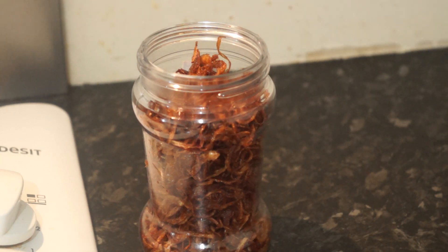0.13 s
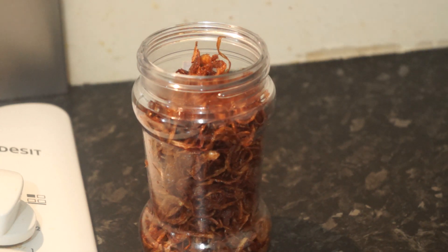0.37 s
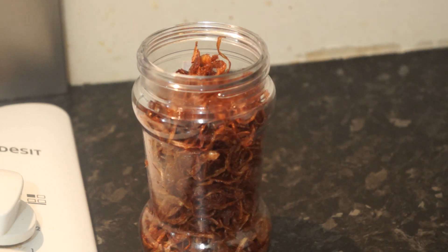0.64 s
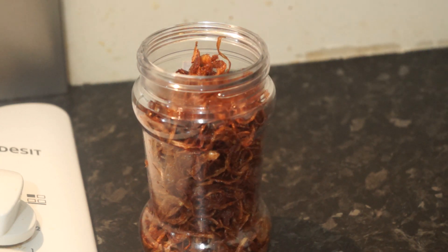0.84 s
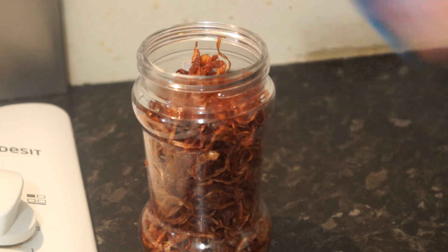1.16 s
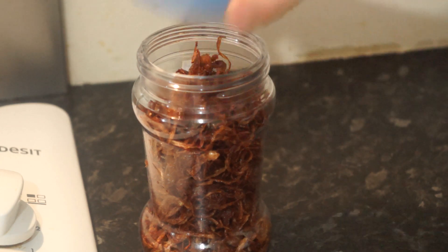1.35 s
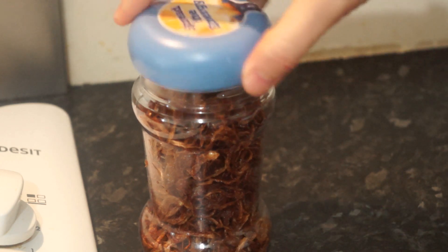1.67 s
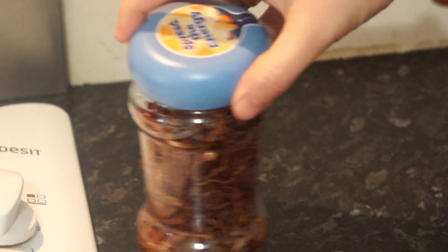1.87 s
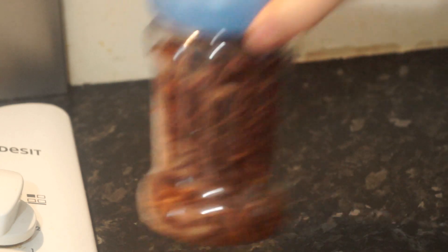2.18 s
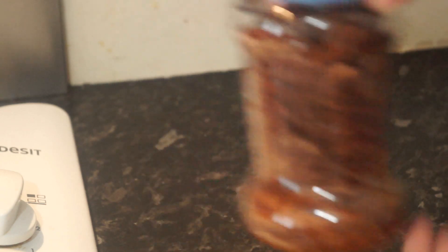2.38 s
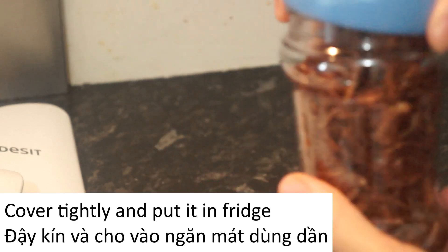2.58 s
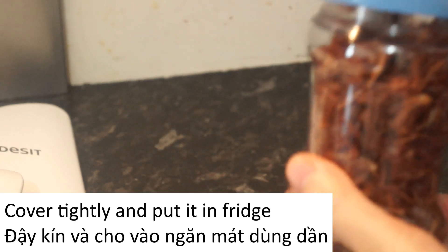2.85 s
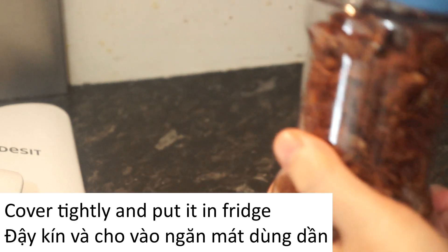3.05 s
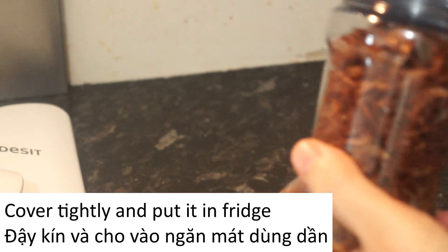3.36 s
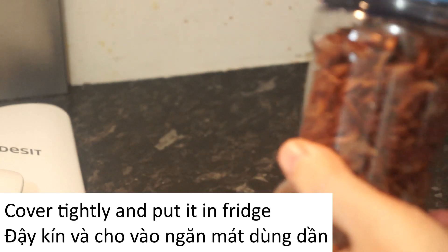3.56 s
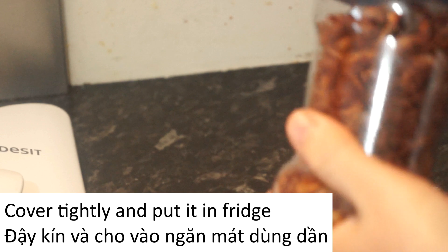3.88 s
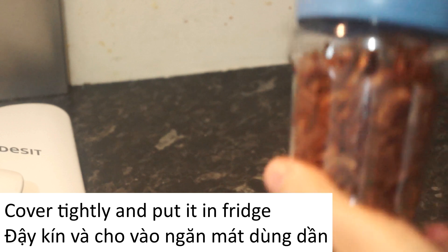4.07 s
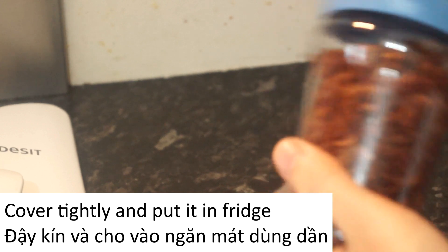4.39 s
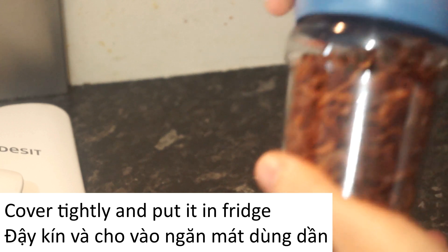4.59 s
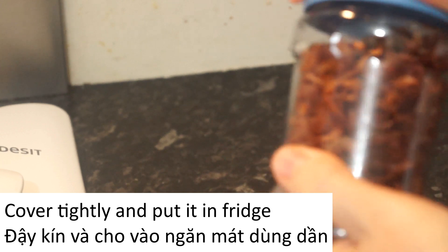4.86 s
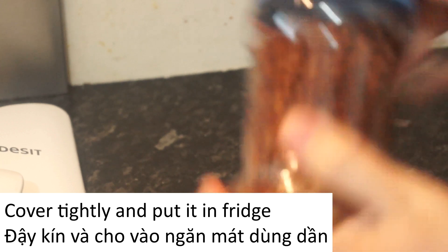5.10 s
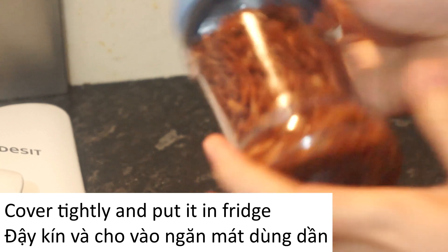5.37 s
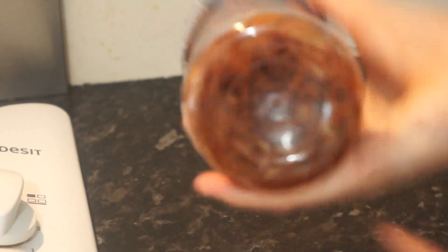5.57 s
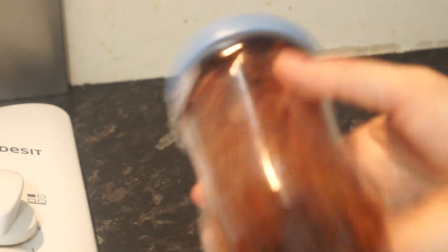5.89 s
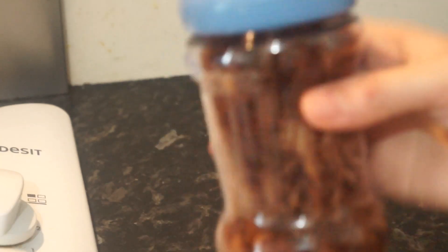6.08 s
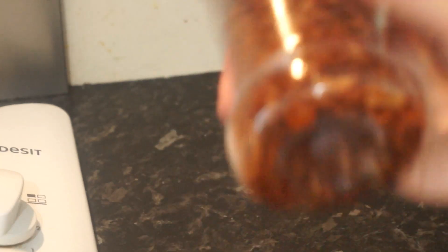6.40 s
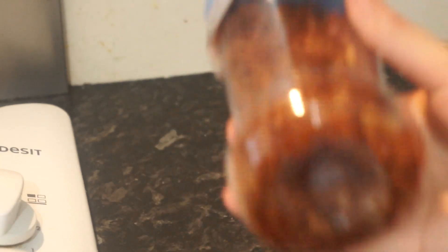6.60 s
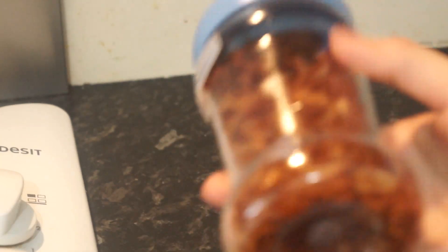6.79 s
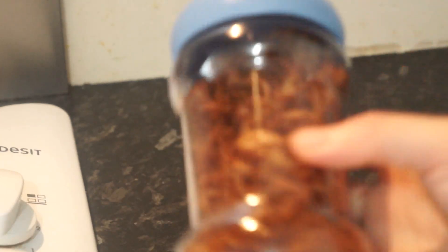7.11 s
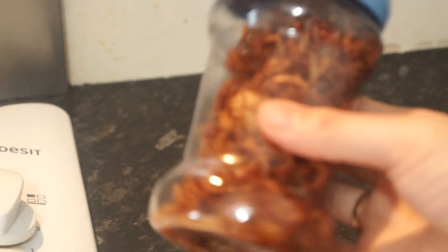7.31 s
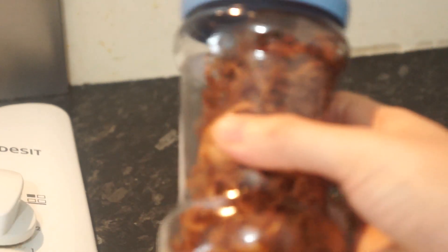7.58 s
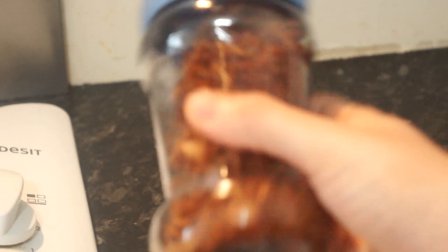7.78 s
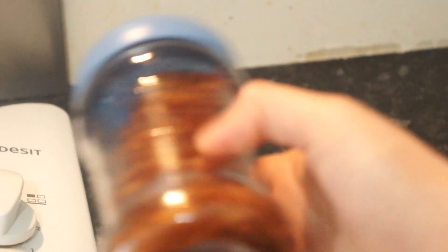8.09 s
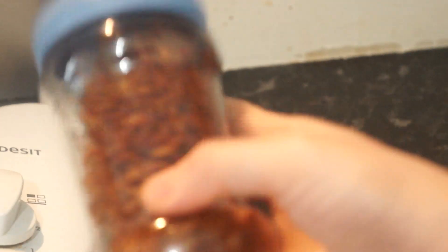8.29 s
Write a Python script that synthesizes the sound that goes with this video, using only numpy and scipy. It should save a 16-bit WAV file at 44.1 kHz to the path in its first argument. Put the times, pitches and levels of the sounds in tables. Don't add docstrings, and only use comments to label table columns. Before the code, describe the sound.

In a small hard kitchen, metal cutlery clatters briefly near the start. A plastic lid knocks onto a hollow plastic jar, seeks its thread, then is twisted shut with irregular sharp snaps and gritty scrapes. After a short lull the jar is tipped and dry crisp pieces pour inside in a dense crackling rustle, then mostly settle. Close stereo camera microphones, slightly hissy, with a faint distant motor.

```python
import sys
import numpy as np
from scipy import signal
from scipy.fft import rfft, irfft, next_fast_len
from scipy.io import wavfile
from scipy.ndimage import uniform_filter1d

SR = 44100
rng = np.random.default_rng(int(sys.argv[2]) if len(sys.argv) > 2 else 0)


def level_to_linear(level):
    exponent = np.asarray(level, float) / 20
    return 10 ** exponent


def master(y):
    cut = np.clip(np.atleast_2d(y).T, -1, 1)
    pcm = np.round(cut * 32767)
    wavfile.write(sys.argv[1], SR, pcm.astype(np.int16))


N = 372592
T = np.arange(N) / SR


def band(x, hz, width_hz):
    return signal.lfilter(*signal.iirpeak(min(hz, .45 * SR), hz / width_hz, fs=SR), x)


def steep(x, hz, width_hz):
    return band(band(x, hz, width_hz), hz, 2 * width_hz)


def unit(x):
    return x / np.sqrt(np.mean(x ** 2))


def read(points, hz):
    f, db = np.transpose(points)[:2]
    return np.interp(np.log(hz + 1), np.log(f), db)


def walk(rate):
    k = int(SR / rate)
    levels = rng.standard_normal(N // k + 1)
    return uniform_filter1d(np.repeat(levels, k), k)[:N]


def held(start, end, edge_s):
    swell = np.minimum(T - start, 0) / edge_s[0]
    fade = np.maximum(T - end, 0) / edge_s[1]
    return np.exp(swell - fade)


def lean(left_minus_right_db):
    return level_to_linear(np.array([[left_minus_right_db], [-left_minus_right_db]]) / 2)


def add(out, s, sound, pan_db):
    i = int(s * SR)
    piece = sound[:N - i]
    out[:, i:i + len(piece)] += piece * lean(pan_db)


def ring(hz, db, t60, push_s, length):
    t = np.arange(int(length * SR)) / SR
    mode = level_to_linear(db) * np.sin(2 * np.pi * hz * t) * 1000. ** (-t / t60)
    return mode * np.minimum(t / push_s, 1)


def tones(table, push_s, pan_db):
    out = np.zeros((2, N))
    for s, hz, db, t60 in table:
        add(out, s, ring(hz, db, t60, push_s, .4), pan_db)
    return out


# pitch in Hz, width in Hz, level in dB.
JAR_MODES = [(197, 180, -17), (338, 140, -4.5), (530, 163, -1.5), (880, 410, 1.5), (1090, 153, -3.5),
             (1564, 880, -5), (2085, 320, -5), (2380, 900, -1), (3600, 840, -4.5), (4420, 900, -5),
             (5320, 660, -9), (7020, 1300, -6.5), (8610, 1650, -6), (10300, 3900, -6)]


def knocks(table, soft_hz, burst_s, trim_db, pan_db, grit_db=-12, rattle_db=-18, click_db=-1):
    hard_db, spot_hz_per_db = -23, 99
    contact = 30
    out, t = np.zeros((2, N)), np.arange(1400) / SR
    zone = np.searchsorted([700, 1500, 4000], np.array(JAR_MODES)[:, 0], side="right")
    tear_gain = level_to_linear(grit_db) * (np.exp(-t / burst_s) + level_to_linear(rattle_db) * np.exp(-t / 0.028))
    for s, peak_db, hollow_db, wall_db, edge_db in table:
        spot_hz = soft_hz + spot_hz_per_db * max(peak_db - hard_db, 0)
        modes = [*JAR_MODES, (spot_hz, spot_hz / 2.5, -10)]
        chance = rng.standard_normal((len(modes), 2))
        tear = rng.standard_normal((len(modes), len(t))) * tear_gain
        tear[:, contact] += 2 * (-1.) ** np.arange(len(modes))
        zones_db = np.array([hollow_db + 5.5, wall_db + 2.5, 0, edge_db + 6.5])
        colour_db = [*zones_db[zone], 0]
        sound = 0
        for (hz, width_hz, db), zone_db, (detune, swing), push in zip(modes, colour_db, chance, tear):
            mode = steep(push, hz * (1 + .04 * detune), width_hz) * level_to_linear(1.5 * swing)
            sound = sound + level_to_linear(db + zone_db) * mode / np.abs(mode).max()
        click = band(1. * (t == t[contact]), spot_hz * 1.3, spot_hz * 1.5)
        sound = sound + level_to_linear(click_db + min(edge_db + 14, 0) / 2) * click / click.max()
        add(out, s - .0005, level_to_linear(peak_db + trim_db) * sound, pan_db + 0.87 * chance[0, 0])
    return out


# hollow 250-700 Hz in dB, wall 700-1500 Hz in dB, edge 4-11 kHz in dB.
SEATING = [(.0121, -47.5, -33, -9, -13), (.3697, -44, -35, -10, -15), (1.6105, -22.5, -26, -7.5, -32),
           (1.7201, -38.5, -13, -21, -35), (1.7905, -39, -13, -27, -22), (1.8465, -19, -14, -17, -10),
           (2.5207, -31, -18, -17, -1), (2.5476, -36, -12, -7, -22), (2.6297, -41.5, -4.5, 4.5, -2),
           (2.7482, -26, -18.5, -10, -14.5), (2.8972, -34.5, -17, -14, -6.5)]
TWISTING = [(3.0037, -21.5, -14, -22, -5.5), (3.0134, -12, -14, -21, -8), (3.0254, -16, -32, -8, -14.5),
            (3.159, -33, -22, -20, -10), (3.1835, -10.5, -23, -13.5, -12.5), (3.254, -26.5, -15.5, -5, -1),
            (3.2885, -21, -22, -18, -8), (3.46, -25.5, -18, -13.5, -5), (3.5285, -37, -3.5, -29, -3),
            (3.5368, -28.5, -26, -7, -12), (3.5511, -29.5, -15, -1.5, -2.5), (3.6812, -27.5, -30, -2, -0.5),
            (3.7525, -22.5, -15, -10.5, -15), (3.774, -43.5, -26, -14, 2.5), (3.8159, -24, -41, -11, -16.5),
            (3.8677, -30, -20, -5.5, -2), (3.8886, -23, -21.5, -8.5, -6.5),
            (4.0035, -24, -24.5, -11.5, -15.5), (4.0115, -25, -19, -8.5, -18), (4.0284, -30, -21, -6, -6),
            (4.021, -31, -20, -6, -8), (4.0436, -32, -35, -14, -14), (4.2612, -18, -33, -9, -9.5),
            (4.2640, -16.5, -24, -19, -10.5), (4.3138, -21, -20, -8, -16), (4.3641, -37, -7, -3, -5)]
HANDLING = [(4.861, -54, -31, -27, 8.5), (5.6535, -24.5, -54, -31, -14), (5.9903, -29.5, -21, -7, -9),
            (6.017, -35, -19, -10, -3), (6.4536, -24, -33, -13, -10), (6.6159, -35.5, -27, -10, -19),
            (7.7667, -46, -14, 3.5, 0), (7.7934, -39.5, -33, -30, -32), (7.869, -52.5, -13, -1, -15),
            (7.9118, -47.5, -17, -2, -3), (8.0072, -48, -20, 3, -5), (8.0977, -58.5, -13, -3, 6)]


def lid_and_jar():
    parts = [(SEATING, 2700), (TWISTING, 2150), (HANDLING, 2600)]
    return sum(knocks(table, soft_hz, burst_s=0.0029, trim_db=-5.5, pan_db=-6.0) for table, soft_hz in parts)


# time of the snap in seconds, build-up in seconds, final level in dB.
JUDDER = [
    (3.004, 0.0081, -46.5),
    (3.183, 0.0029, -25.5),
    (3.684, 0.01, -39.5),
    (4.029, 0.0095, -53),
    (4.26, 0.0034, -35),
]


def judder(left_db=3.0):
    swell = sum(level_to_linear(db) * np.exp(np.minimum(T - s, 0) / rise_s) * (T < s) for s, rise_s, db in JUDDER)
    grit = rng.standard_normal(N)
    colour = unit(band(grit, 990, 540) + 0.4 * band(grit, 1600, 5100))
    return swell * colour * lean(2 * left_db)


# start in seconds, end in seconds, scrape in dB, hollow rub in dB, scrape pitch in Hz.
STROKES = [(0.97, 1.034, -53, -48.5, 3160), (1.06, 1.213, -58, -51, 3160), (1.602, 1.85, -88, -55, 2500),
           (1.95, 2.244, -80, -62, 2500), (2.44, 2.658, -45, -58, 3950), (2.724, 2.798, -47.5, -51, 3160),
           (3.107, 3.21, -46, -51.5, 3000), (3.174, 3.345, -37.5, -45.5, 3300),
           (3.502, 3.57, -63, -50, 3160), (3.675, 3.75, -64, -46, 3160), (3.896, 4.03, -51, -62, 3160),
           (4.257, 4.49, -48, -55, 2900), (3.02, 3.09, -38, -60, 4200), (7.2, 7.45, -60, -80, 1850)]


def rub(left_db=-5.0):
    edge_s = 0.019
    grip = np.array([held(start, end, (edge_s, edge_s)) for start, end, *_ in STROKES])
    high_db, low_db, scrape_hz = np.array(STROKES)[:, 2:].T
    slips = rng.standard_normal(N) * level_to_linear(3.0 * walk(200))
    scrape = 0
    for hz in 1800 * 1.25 ** np.arange(7):
        nearness = np.exp(-(np.log(hz / scrape_hz) / 0.16) ** 2)
        level = (level_to_linear(high_db) * nearness) @ grip
        scrape = scrape + level * unit(steep(slips, hz, hz / 3.5))
    hollow = unit(band(slips, 400, 82) + 2.4 * band(slips, 965, 420))
    hollow = (level_to_linear(low_db) @ grip) * hollow
    return (level_to_linear(-14.5) * scrape + level_to_linear(-9.5) * hollow) * lean(2 * left_db)


# time in seconds, left minus right in dB.
JAR_SIDE = [
    (0, -5),
    (8.3, -4),
    (8.45, 7),
]


def jar_side(s):
    return np.interp(s, *np.transpose(JAR_SIDE))


# start in seconds, end in seconds, level in dB.
POURS = [
    (5.11, 5.6, -65),
    (5.588, 5.638, -55),
    (5.675, 6.568, -45.5),
    (7.595, 7.715, -65),
    (7.786, 8.1, -70.5),
    (8.35, 8.5, -58),
]
# time of the top in seconds, level in dB, build-up in seconds.
SLIDES = [(5.665, -36.5, 0.021), (5.748, -40.5, 0.031), (5.833, -33.5, 0.0055), (5.912, -34, 0.02),
          (6.01, -35.5, 0.022), (6.042, -34, 0.014), (6.174, -34.5, 0.0091), (6.212, -44, 0.0036),
          (6.268, -54, 0.003), (6.34, -34.5, 0.0066), (6.372, -44, .002), (6.427, -34.5, 0.0064),
          (6.466, -34, 0.012), (6.52, -33.5, 0.028), (7.776, -52, .004), (7.915, -58, .004),
          (8.355, -67, .004), (8.426, -49, 0.0027)]
# frequency in Hz, level in dB per Hz.
CRISP = [(710, -36), (1200, -15), (1580, -17), (1930, -12), (2300, 4), (3120, 0), (3860, 0.5), (4560, -1),
         (7250, 3), (11000, -16), (14300, -43), (22000, -120)]


def tumble(spread_db=2.5, sharp=4.3, wall_db=-3):
    settle_s, pour_edge_s, weight_db = 0.014, 0.02, -4.5
    pour = sum(level_to_linear(db) * held(a, b, (pour_edge_s / 2, pour_edge_s)) for a, b, db in POURS)
    slide = sum(level_to_linear(db) * held(s, s, (rise_s, settle_s)) for s, db, rise_s in SLIDES)
    ticks, drum = np.zeros((2, N)), np.zeros((2, N))
    for hz in 1300 * 2 ** np.arange(0, 3.15, 1 / 6):
        at = rng.integers(0, N, int(250 * N / SR))
        size = level_to_linear(spread_db * np.minimum(rng.exponential(size=len(at)), 4.2))
        side = rng.random(len(at)) * np.pi / 2
        hits = np.zeros((2, N))
        hits[:, at] = size * rng.choice([-1, 1], len(at)) * np.array([np.cos(side), np.sin(side)])
        ticks += level_to_linear(read(CRISP, hz)) * steep(hits, hz, hz / sharp)
    # (Hz, width Hz, dB)
    wall = [(476, 200, -3), (1050, 330, 1.5), (1290, 1100, 5.0), (2100, 610, 1.5), (3795, 200, 9.0)]
    for hz, width_hz, db in wall:
        drum += level_to_linear(db + 3.5 * walk(22)) * unit(steep(rng.standard_normal(N), hz, width_hz))
    pieces = np.hypot(pour, slide) * unit(ticks)
    weight = pour * level_to_linear(weight_db + wall_db) * unit(drum)
    pan_db = jar_side(T) - 2.5
    return level_to_linear(2.1 * walk(60)) * (pieces + weight) * level_to_linear(np.array([pan_db, -pan_db]) / 2 - 3.5)


# time in seconds, peak in dB, pitch in Hz.
CRACKS = [(4.477, -36, 6940), (4.505, -35.5, 7500), (5.284, -38, 2580), (5.387, -42, 2610),
          (5.4936, -41, 7150), (5.52, -40, 8270), (5.552, -39, 4700), (5.58, -35, 2730), (7.635, -52, 6430),
          (8.355, -37, 2650), (8.386, -44, 7500), (8.399, -41, 8610), (8.4239, -21.5, 7160),
          (5.65, -23, 7350), (5.6595, -26, 4370), (5.6664, -26, 6180), (5.7415, -27, 3680),
          (5.7447, -34, 3370), (5.79, -34, 3090), (5.8316, -21, 7000), (5.8364, -21, 3300),
          (5.8422, -36, 6740), (5.8467, -34, 6740), (5.8723, -26, 3680), (5.8834, -23, 7350),
          (5.8997, -21, 7300), (5.905, -28, 6740), (5.9102, -28, 4770), (5.921, -25, 3650),
          (5.9945, -28, 4010), (5.999, -23, 3090), (6.0087, -30, 6200), (6.0185, -30, 3680),
          (6.029, -16.5, 7200), (6.0359, -23, 3370), (6.044, -21, 5670), (6.051, -24, 5670),
          (6.0615, -28, 7350), (6.1492, -31, 6180), (6.166, -31, 5200), (6.1714, -24, 3370),
          (6.1757, -28, 5200), (6.1812, -28, 5200), (6.2093, -27, 4010), (6.2132, -30, 3700),
          (6.233, -34, 4010), (6.266, -19.5, 7300), (6.2813, -25, 6740), (6.2927, -32, 6740),
          (6.337, -25, 6740), (6.351, -24, 5670), (6.36, -27, 6180), (6.3705, -14.5, 6300),
          (6.378, -30, 6180), (6.393, -34, 5200), (6.4023, -31, 5670), (6.4253, -27, 5670),
          (6.429, -26, 5200), (6.445, -26.5, 2800), (6.4502, -21, 6740), (6.4533, -36, 2600),
          (6.4645, -35, 4370), (6.4685, -22, 6740), (6.4738, -27, 4010), (6.4788, -20.5, 2520),
          (6.483, -26, 2600), (6.4986, -23, 3400), (6.514, -21, 3460), (6.5213, -19, 3730),
          (6.525, -30, 5670), (6.5364, -23, 6740), (6.5425, -31, 4010), (6.56, -36, 6740)]


def crumbs(burst_s=0.00045, sharp=4.2, trim_db=-1, click=2.2, broad=0.28):
    out, t = np.zeros((2, N)), np.arange(500) / SR
    for s, peak_db, hz in CRACKS:
        pan_db = jar_side(s) + 2.0 * rng.standard_normal()
        grit = rng.standard_normal(len(t)) * np.exp(-t / burst_s)
        grit[4] += click
        crack = band(grit, hz, hz / sharp)
        crack = crack + broad * band(grit, 5500, 6500) * min(hz / 6500, 1)
        add(out, s - .0003, level_to_linear(peak_db + trim_db) * crack / np.abs(crack).max(), pan_db)
    return out


# time in seconds, peak in dB, 250-700 Hz in dB, 700-1500 Hz in dB, 4-11 kHz in dB.
CLATTER = [
    (.9467, -47, -7, 8.5, -13),
    (.9708, -48, 2, 0, -8),
    (.9926, -37, -10, 0, -8.5),
    (1.045, -41.5, 7.5, 2, 7),
    (1.0511, -21.5, -7.5, 0, -21),
    (1.0888, -46, -14, 11.5, -3),
    (1.1175, -32.5, 0.5, 7.5, -9),
    (1.1293, -42, -9, 8.5, 6),
    (1.15, -57, -13, -10, 3),
]


def clatter():
    return knocks(CLATTER, 5000, burst_s=0.0098, trim_db=-9.0, pan_db=-3.5)


# time in seconds, pitch in Hz, level in dB, t60 in seconds.
STEEL = [(.95, 4200, -60, .4), (.995, 2000, -48, .08), (1.052, 3515, -31, .08), (1.07, 3515, -50, .35),
         (1.052, 1884, -40, .06), (1.062, 1877, -46, .15), (1.138, 1880, -51, .5), (1.052, 4317, -44, .17),
         (1.052, 4167, -50, .17), (1.062, 2336, -35.5, .18), (1.1, 2345, -51, .25), (1.05, 5685, -48, .06),
         (1.068, 5685, -45, .16), (1.1, 5690, -54, .3), (1.058, 3225, -44, .5), (1.075, 3229, -45, .3),
         (1.1001, 3225, -43, .3), (1.205, 3240, -63, .5), (1.13, 3222, -50, .3), (1.129, 8565, -49, .15)]


def steel_ring():
    return tones(STEEL, push_s=.002, pan_db=-5)


# time in seconds, pitch in Hz, level
# in dB, t60 in seconds.
PINGS = [(1.052, 508, -23.5, 0.03), (1.118, 580, -30, 0.048), (1.847, 1096, -23.5, 0.028),
         (1.847, 3050, -25.5, 0.033), (2.521, 3560, -34.5, 0.028), (2.749, 4110, -32.5, 0.042),
         (2.749, 2800, -37, .04), (2.752, 1087, -38, 0.047), (2.898, 2870, -40, 0.029),
         (3.013, 1975, -21, 0.026), (3.013, 3425, -17, .025), (3.014, 520, -28, 0.053),
         (3.025, 2830, -23, 0.065), (3.184, 1830, -23, 0.011), (3.184, 3160, -18, 0.027),
         (3.288, 3860, -22, 0.022), (3.289, 2160, -29, .04), (3.46, 2900, -29, 0.02),
         (3.552, 1930, -26.5, 0.028), (3.7525, 1990, -30, 0.033), (3.888, 2115, -27, 0.038),
         (4.004, 1945, -32.5, 0.044), (4.264, 3220, -41, 0.017), (4.264, 2100, -25.5, 0.025),
         (4.264, 4100, -32, 0.045), (4.314, 2210, -27, 0.027), (4.314, 4200, -30, .02),
         (4.266, 3770, -29, 0.036), (1.849, 2258, -36, .1), (1.849, 1314, -31.5, 0.044),
         (1.625, 1650, -45, 0.16), (5.836, 4840, -33, 0.035), (6.176, 5450, -32, .04),
         (6.172, 3810, -40, .05), (6.19, 3950, -40, .05), (6.212, 3780, -39, .1), (6.52, 3750, -33, 0.045),
         (3.2, 1900, -33, 0.055)]


def struck_spots():
    return level_to_linear(-0.5) * tones(PINGS, push_s=0.0017, pan_db=-6.0)


# time in seconds, pitch in Hz, level in dB, t60 in seconds.
BOOMS = [(1.052, 1305, -25.5, 0.046), (1.07, 1290, -38, 0.25), (1.09, 820, -40, .15), (1.13, 700, -38, .2),
         (1.165, 830, -42, .3), (1.66, 760, -46, .12), (7.92, 120, -72, .4), (2.55, 1060, -42, .1),
         (1.62, 1050, -40, .15), (1.85, 200, -46, .2), (1.118, 880, -42, 0.06), (1.118, 1200, -31.5, 0.051),
         (1.145, 880, -37.5, 0.15), (1.612, 1072, -22, 0.038), (1.614, 402, -38, 0.14),
         (1.795, 389, -51, 0.22), (2.632, 210, -50.5, 0.053), (2.775, 215, -45, 0.092),
         (2.9, 202, -45, 0.078), (3.03, 896, -35, 0.25), (3.686, 1143, -35, 0.12), (3.7, 1286, -44, 0.1),
         (4.02, 1082, -39, 0.081), (4.266, 912, -34, 0.12), (5.663, 1090, -29, 0.041),
         (5.675, 1200, -39, 0.084), (5.69, 1004, -47, 0.2), (5.654, 2100, -33, 0.044),
         (5.84, 1093, -38, 0.071), (5.85, 3950, -41, .1), (5.868, 3810, -36, 0.08), (5.84, 423, -45, 0.079),
         (6.51, 330, -49, 0.077), (5.985, 476, -39.5, 0.083), (6.008, 524, -32.5, 0.039),
         (6.458, 1009, -32, 0.3), (6.49, 1100, -38, 0.1), (6.453, 2160, -29.5, 0.054),
         (6.475, 2140, -23, 0.036), (6.455, 1215, -38.5, 0.18), (6.617, 1009, -52, 0.34),
         (1.868, 380, -41, .15), (3.69, 1180, -38, .2), (3.196, 950, -37, .2), (4.32, 880, -41, .2),
         (2.17, 1152, -61, .4), (6.462, 2125, -30, .15), (1.655, 1136, -50, 0.052),
         (1.72, 1117, -41, 0.061)]


def hollow_booms():
    return tones(BOOMS, push_s=0.00203, pan_db=-2.5)


def thumps(x, level_db=-20, smooth_s=.008, top_hz=90):
    push = uniform_filter1d(np.abs(x.mean(axis=0)), int(smooth_s * SR))
    rumble = signal.lfilter(*signal.butter(1, top_hz, fs=SR), push * rng.standard_normal(N))
    return level_to_linear(level_db) * rumble


# centre in Hz, t60 in seconds, level in dB, left-right likeness from 0 to 1.
ROOM = [(194, 0.47, -11, 0.98), (447, 0.37, -12.5, 0.97), (1200, 0.45, -11.5, 0.66), (2800, 0.42, -18, 0.2),
        (6900, 0.51, -14, 0), (9700, 0.12, -5.5, 0)]


def room(x, gap_s=0.0005, early_db=-5, early_s=0.0045, left_db=-1.0, flutter_db=1, moves=12):
    t = np.arange(int(.6 * SR)) / SR
    answer = np.zeros((2, 2, len(t)))
    for hz, t60, db, alike in ROOM:
        alike = np.clip(alike, 0, 1)
        mid, side = band(rng.standard_normal((2, 2, 1, len(t))), hz, hz)
        pair = np.sqrt(1 + alike) * mid + np.sqrt(1 - alike) * side * np.array([[1], [-1]])
        answer += level_to_linear(db) * pair * 1000. ** (-t / t60)
    early = 1 + level_to_linear(early_db) * np.exp(-t / early_s)
    answer *= early * np.minimum(t / gap_s, 1) ** 2 * level_to_linear(-23.0)
    place = 2 * walk(moves)
    source = x.mean(axis=0) * np.array([[np.cos(place)], [np.sin(place)]])
    size = next_fast_len(N + len(t))
    echoes = irfft((rfft(source, size) * rfft(answer, size)).sum(axis=0), size)[:, :N]
    return echoes * lean(left_db) * level_to_linear(flutter_db * walk(280))


# pitch in Hz, width in Hz, level in dB.
WHINE = [(2600, 550, -87.5), (1084, 250, -73)]
# multiple of the turning rate, level in dB.
BUZZ = [(50, -86), (51, -86), (52, -89), (53, -84), (54, -86), (55, -83), (56, -83)]


def motor():
    turn_hz = 49.36
    hum, comb = 0, 0
    for hz, width_hz, db in WHINE:
        hum = hum + level_to_linear(db + 2.7 * walk(1.51)) * unit(band(rng.standard_normal(N), hz, width_hz))
    for k, db in BUZZ:
        comb = comb + level_to_linear(db + 1.2 * walk(1.1)) * np.sin(2 * np.pi * (k * turn_hz * T + rng.random()))
    return hum + comb * level_to_linear(9)


# frequency in Hz, level in dB per Hz.
HISS = [(15, -85), (25, -37), (60, -33), (95, -27), (139, -22.5), (233, -16), (342, -10), (557, -6),
        (650, -4.5), (720, -4.5), (862, -5), (1140, -5.5), (2660, -5.5), (3030, -7), (10600, -15.5),
        (11500, -33), (15000, -78), (22000, -120)]
# frequency in Hz, side minus mid in dB.
HISS_SIDE = [(60, -8), (110, -7), (190, -5), (350, -2), (620, 0), (1120, 2.5), (2010, 0.5), (3610, -0.5),
             (6470, 0.5), (11600, -1)]


def hiss():
    hiss_db = -62
    size = next_fast_len(N)
    hz = np.arange(size // 2 + 1) * SR / size
    mid, side = rfft(rng.standard_normal((2, size))) * level_to_linear(read(HISS, hz))
    scale = np.std(irfft(mid, size))
    mid, side = irfft([mid, side * level_to_linear(read(HISS_SIDE, hz))], size)[:, :N] / scale
    breath = level_to_linear(hiss_db - .7 + .9 * walk(3))
    return breath * np.array([.95 * (mid + side), 1.05 * (mid - side)])


def scene():
    close = lid_and_jar() + judder() + rub() + tumble() + crumbs() + clatter()
    steel, pings, booms = steel_ring(), struck_spots(), hollow_booms()
    ringing_share = .12 * steel + .4 * booms + .35 * pings
    touched = booms * level_to_linear(2.5 * walk(110))
    heard = close + steel + pings + room(close + ringing_share) + touched
    bass_cut = signal.butter(2, 150, "high", fs=SR, output="sos")
    bass_leak = level_to_linear(-48) * close.mean(axis=0)
    return signal.sosfilt(bass_cut, heard) + bass_leak + thumps(heard) + hiss() + motor()


def roll_off(x):
    return signal.sosfilt(signal.butter(12, 12220, fs=SR, output="sos"), x)


def record(dry):
    top_cut = signal.ellip(10, .2, 48, 11100, fs=SR, output="sos")
    mix = signal.sosfilt(top_cut, dry)
    return roll_off(mix)


dry = scene()
out = record(dry)
master(out)
```